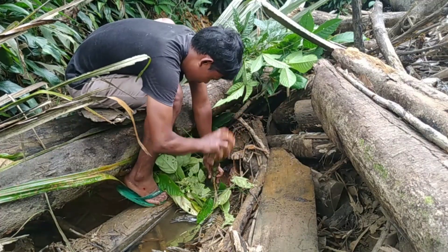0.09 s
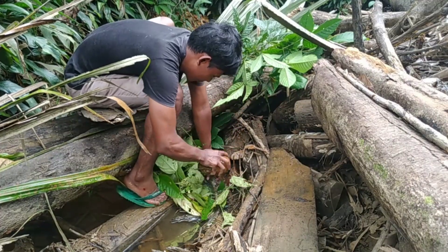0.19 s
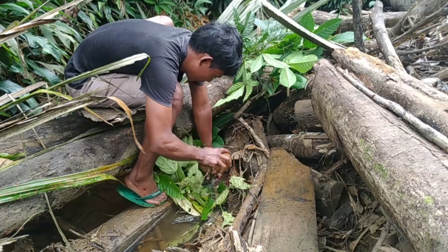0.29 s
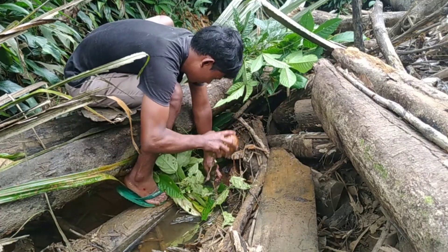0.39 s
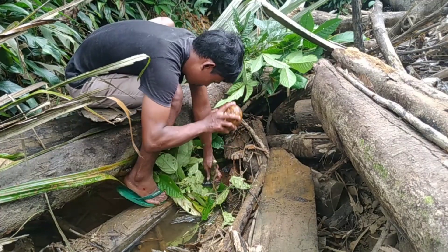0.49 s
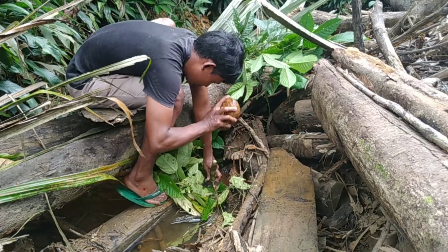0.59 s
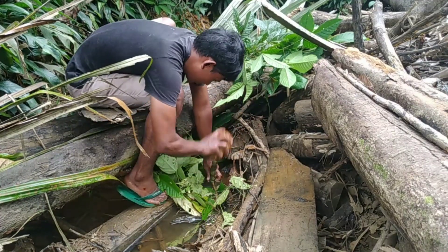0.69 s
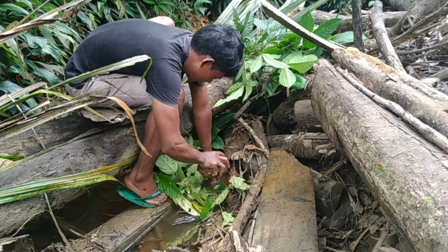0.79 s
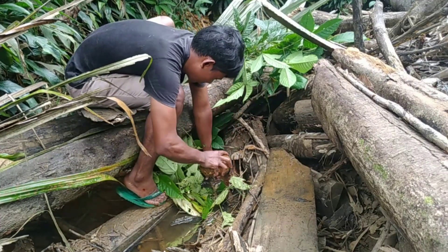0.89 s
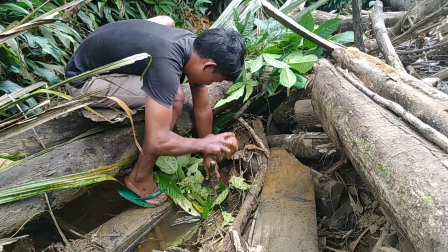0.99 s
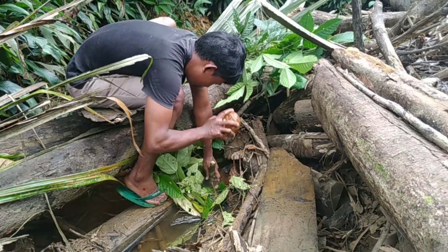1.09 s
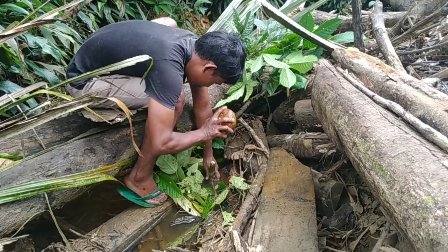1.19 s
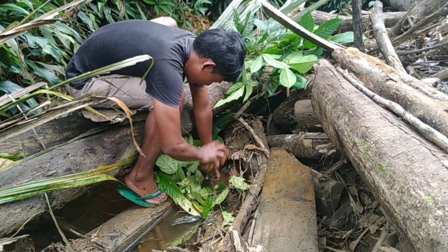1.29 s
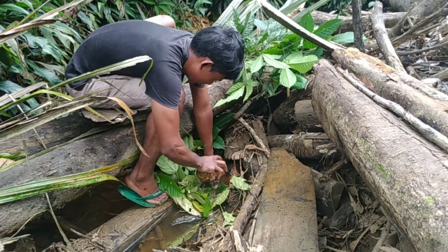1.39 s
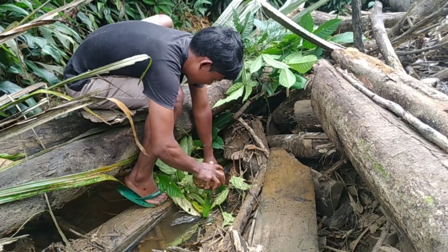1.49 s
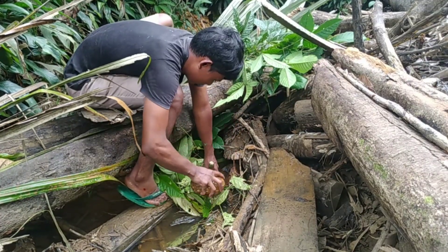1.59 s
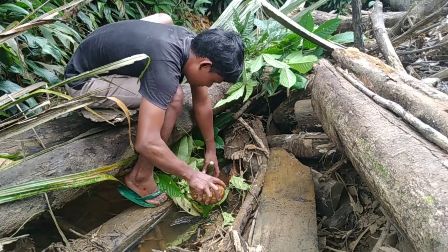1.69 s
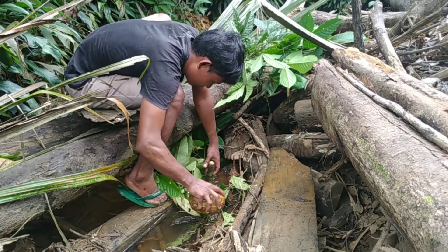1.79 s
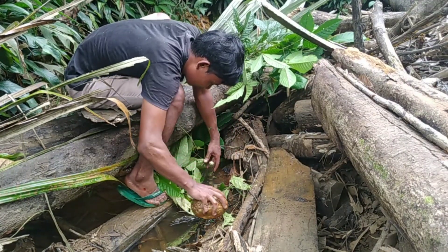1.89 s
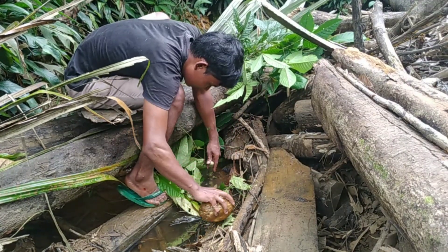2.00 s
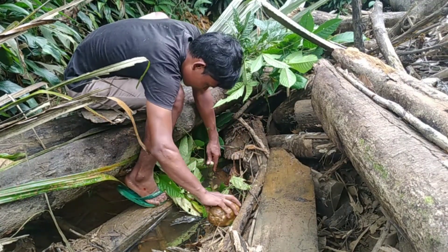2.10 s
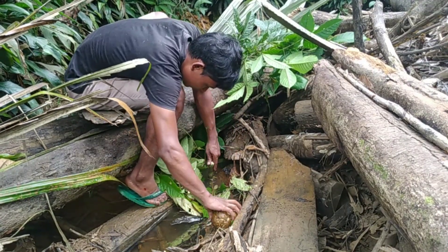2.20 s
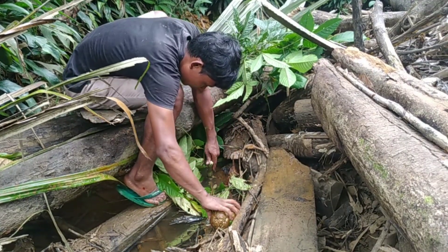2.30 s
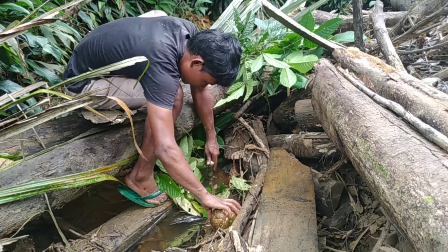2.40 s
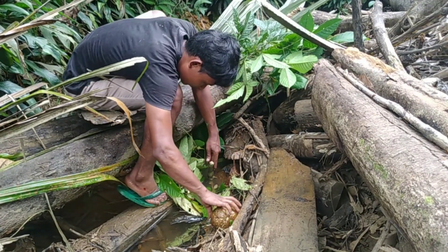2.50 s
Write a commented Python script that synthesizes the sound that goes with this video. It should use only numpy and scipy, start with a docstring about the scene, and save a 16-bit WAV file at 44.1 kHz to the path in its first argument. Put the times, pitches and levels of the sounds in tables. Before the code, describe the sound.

Fist-sized lump thuds three times on a leafy log with wet crunches, over steady cicada hiss

```python
"""Dull wooden knocks: a hard, fist-sized lump pounds wet leaves on a log three times, then is set down.
The knocks sum damped modes of the log; cracks, crunch, snaps and scatter are noise under decaying envelopes.
A hand shifts the leaves in between, heard as enveloped grainy noise; insects whistle near 12 kHz as gliding sines.
Cicadas hiss on the right in shaped noise with narrow trills, crickets trill in narrow bands of noise,
and air and stream water murmur faintly as low and broad shaped noise."""
import sys
import numpy as np
from scipy import signal
from scipy.fft import rfft, irfft
from scipy.io import wavfile

SR = 44100
rng = np.random.default_rng(int(sys.argv[2]) if len(sys.argv) > 2 else 0)


def wav_record(signal):
    """Record a signal, one row per channel, as 16-bit PCM in the file named by sys.argv[1]."""
    frames = np.transpose(np.atleast_2d(signal))
    bounded = np.clip(frames, -1, 1)
    # unit amplitude maps onto the largest positive 16-bit level
    quanta = np.round(bounded * 32767).astype(np.int16)
    wavfile.write(sys.argv[1], SR, quanta)


N = 112455
TIME = np.arange(N) / SR
FREQS = np.maximum(np.fft.rfftfreq(N, 1 / SR), 1)   # Hz, kept above zero for the logarithm


def from_db(db):
    """Level: an amplitude gain is ten to the power dB / 20."""
    return 10 ** (np.asarray(db) / 20)


def rms_one(x):
    """Normalisation: scale to unit mean power."""
    return x / np.sqrt(np.mean(x ** 2) + 1e-20)


def over_hz(rows):
    """Spectral interpolation: each table column is joined by straight lines over log frequency."""
    hz, *columns = np.transpose(rows)
    return [np.interp(np.log(FREQS), np.log(hz), column) for column in columns]


def pan(left_minus_right_db):
    """Constant-power panning: the two gains differ in level while their summed power is fixed."""
    ratio = from_db(np.atleast_1d(left_minus_right_db))
    return np.array([ratio, np.ones_like(ratio)]) * np.sqrt(2 / (1 + ratio * ratio))


def drift(rate_hz):
    """Low-pass random process: white noise weakened above a given rate, with rms 1."""
    white = rfft(rng.standard_normal(N))
    return rms_one(irfft(white / (1 + (FREQS / rate_hz) ** 2), N))


def noise(spectrum, place):
    """Interaural coherence: mid and side noises mix to a set likeness and balance at each frequency."""
    (level_db,) = over_hz(spectrum)
    likeness, lean_db = over_hz(place)
    likeness = np.clip(likeness, -1, 1)
    mid, side = rfft(rng.standard_normal((2, N)))
    pair = np.sqrt(1 + likeness) * mid + np.sqrt(1 - likeness) * side * [[1], [-1]]
    return rms_one(irfft(pair * from_db(level_db) * pan(lean_db), N))


def decay(age, t60):
    """Exponential damping: the level falls 60 dB in every t60."""
    return np.exp(-np.log(1000) * age / t60)


def burst(start, rise, hold, t60):
    """Transient envelope: linear attack, hold and exponential release, all in s."""
    age = TIME - start
    return np.clip(age / rise, 0, 1) * decay(np.maximum(age - rise - hold, 0), t60)


# Stereo image of the near sounds: f/Hz, likeness of left and right, left minus right/dB
NEAR_PLACE = [(100, 0.98, 0.5), (590, 0.73, -4), (1400, 0.36, 1), (2400, 0.18, -1), (4400, 0, -3.5),
              (8400, 0.13, -4), (11100, 0, -27), (15000, 0.3, -9)]
GRAINS_PER_S, GRAIN_DB = 1200, 3   # upper rate of the clumping; its level spread before limiting


def grainy(spectrum):
    """Amplitude modulation: fast random level swings clump noise like many tiny fibres snapping."""
    swing = np.clip(drift(GRAINS_PER_S), -2, 2)
    return rms_one(noise(spectrum, NEAR_PLACE) * from_db(GRAIN_DB * swing))


# Blows on the log, levels relative to each layer: t/s, knock level/dB, pitch factor, crack level/dB,
# crack centre f/Hz, crunch level/dB, scatter level/dB, second contact delay t/s, its relative level/dB
BLOWS = [(0.2206, 2, 1.01, 2.5, 2500, 0, -1, .0095, -29), (0.834, 3, 1, -3.5, 1170, -1, -2, 0.0045, -30),
         (1.4222, 0, 1.0, -1.5, 3100, -0.5, -0.5, .0088, -7),
         (2.262, -23.5, 1.0, -23, 1090, -18.5, -16, .012, -6.5)]
# Modes of the log before pitch, blow and filter act: f/Hz, level/dB, t60/s
LOG_MODES = [(109.9, -23, 0.13), (143, -24, 0.024), (198, -22, 0.05), (378, -11, 0.026), (453, -10, 0.027),
             (580, -24.5, 0.067), (740, -21.5, 0.031), (1025, -18, 0.027), (1160, -21, .035),
             (1393, -19.5, 0.021), (2340, -37.5, 0.13)]
KNOCK_LOW_CUT_HZ, CONTACT_HZ = 82, 3000   # the knocks are cut below this; the leaf cushion softens above
CONTACT_S = 0.00078   # time for the force to build


def knocks():
    """Modal superposition: two contacts per blow excite damped sinusoidal modes of the log."""
    out = np.zeros(N)
    for blow_s, blow_db, pitch, *_, delay_s, second_db in BLOWS:
        contacts = ((blow_s, blow_db), (blow_s + delay_s, blow_db + second_db))
        for start, contact_db in contacts:
            first = int(start * SR)
            age = TIME[:min(SR // 4, N - first)]
            force = np.minimum(age / CONTACT_S, 1)
            for hz, mode_db, t60 in LOG_MODES:
                chance_db = rng.standard_normal()   # no two contacts drive a mode alike
                gain = from_db(contact_db + mode_db + chance_db)
                mode = np.sin(2 * np.pi * hz * pitch * age) * decay(age, t60)
                out[first:first + len(age)] -= gain * force * mode
    band = signal.butter(1, [KNOCK_LOW_CUT_HZ, CONTACT_HZ], "band", fs=SR, output="sos")
    return signal.sosfilt(band, out + 1e-18)


# Spectrum of the crack before its peak is added: f/Hz, level per Hz/dB
CRACK_SPECTRUM = [(200, -27), (600, 0), (1300, 0), (1800, -2.5), (2500, -4.5), (3400, -5), (4300, -16),
                  (8000, -15), (10800, -12), (15000, -12)]
CRACK_DB, CRACK_RISE_S, CRACK_T60_S = -12, 0.00072, 0.019   # level before each blow's own
CRACK_PEAK_DB, CRACK_WIDTH_OCT = 10, 0.16   # Gaussian peak over log frequency


def cracks():
    """Spectral emphasis: a peak at its own frequency colours the brief noise of each first contact."""
    out = 0
    for start, _, _, blow_db, centre_hz, *_ in BLOWS:
        octaves = np.log2(FREQS / centre_hz)
        peak = from_db(CRACK_PEAK_DB * np.exp(-(octaves / CRACK_WIDTH_OCT) ** 2))
        crack = rms_one(irfft(rfft(noise(CRACK_SPECTRUM, NEAR_PLACE)) * peak, N))
        out = out + crack * from_db(CRACK_DB + blow_db) * burst(start, CRACK_RISE_S, 0, CRACK_T60_S)
    return out


# Spectrum of the squeezed wet leaves: f/Hz, level per Hz/dB
CRUNCH_SPECTRUM = [(200, 9.5), (500, 4), (800, 8), (1200, -4), (2000, -5.5), (3000, -1.5), (4000, -5.5),
                   (5200, -8), (8300, -9.5), (9600, 3.5), (10800, 10), (12000, 0.5), (13300, -12),
                   (15500, -12)]
CRUNCH_DB = -18.5   # before each blow's own level
CRUNCH_RISE_S, CRUNCH_HOLD_S, CRUNCH_T60_S = 0.00034, 0.012, 0.058


def crunch():
    """Granular friction: squeezed leaves give clumped noise that holds briefly, then decays."""
    envelope = 0
    for start, *_, blow_db, _, _, _ in BLOWS:
        squeeze = burst(start, CRUNCH_RISE_S, CRUNCH_HOLD_S, CRUNCH_T60_S)
        envelope += from_db(CRUNCH_DB + blow_db) * squeeze
    return envelope * grainy(CRUNCH_SPECTRUM)


# Stems snapping as they are squashed: t/s, level/dB
SNAPS = [(0.233, -26), (0.8442, -21), (0.8534, -22.5), (1.4305, -39), (1.443, -22)]
# Spectrum of the snaps: f/Hz, level per Hz/dB
SNAP_SPECTRUM = [(1000, -26), (3000, 12), (6000, 6), (8500, -29), (10800, 18), (13000, 6), (15500, -14)]
SNAP_RISE_S, SNAP_T60_S = 0.00013, 0.018


def snaps():
    """Impulsive fracture: each breaking stem releases a sharp burst of coloured noise."""
    envelope = sum(from_db(db) * burst(start, SNAP_RISE_S, 0, SNAP_T60_S) for start, db in SNAPS)
    return envelope * noise(SNAP_SPECTRUM, NEAR_PLACE)


# Spectrum scattered by the logs and trees around: f/Hz, level per Hz/dB
SCATTER_SPECTRUM = [(40, -44), (90, 13.5), (200, -0.5), (500, -7), (1200, -11), (2600, -5.5), (4200, -8.5),
                    (8000, -11), (11000, -1.5), (15000, -15.5)]
SCATTER_DB, SCATTER_RISE_S, SCATTER_T60_S = -23, 0.0055, 0.23   # level before each blow's own


def scatter():
    """Diffuse reflection: sound returned from the surroundings builds more slowly and lingers."""
    envelope = 0
    for start, *_, blow_db, _, _ in BLOWS:
        returned = burst(start, SCATTER_RISE_S, 0, SCATTER_T60_S)
        envelope += from_db(SCATTER_DB + blow_db) * returned
    return envelope * grainy(SCATTER_SPECTRUM)


# Leaves and sticks shifting: t/s, scuff level/dB, leaf hiss level/dB, rise t/s, t60/s
RUSTLES = [(0.2703, -44.5, -52, .002, 0.13), (0.3271, -28.5, -50, 0.0016, 0.054),
           (0.895, -69, -36, 0.016, .12), (0.929, -50, -53, 0.0033, 0.039), (1.490, -45, -45, 0.0033, .1),
           (1.60, -62, -57, 0.067, 0.87), (1.715, -52, -60, 0.02, 0.18), (2.236, -49.5, -53, 0.018, 0.13),
           (2.272, -51, -35, 0.0036, 0.16)]
# Spectrum of the woody scuff: f/Hz, level per Hz/dB
SCUFF_SPECTRUM = [(150, -30), (450, -4), (1000, 0.5), (1400, -2), (1650, 4), (1900, -5.5), (2200, 0),
                  (2550, -3), (2850, -1), (4000, -13), (6000, -23), (11000, -18), (15000, -28)]
# Spectrum of the leafy hiss: f/Hz, level per Hz/dB
LEAF_HISS_SPECTRUM = [(1000, -8), (3000, -10), (6000, -8), (9000, -13), (11500, 3), (13500, -4),
                      (15500, -24)]


def rustles():
    """Frictional noise: woody scuffs and leafy hisses share one envelope for each movement."""
    scuff, hiss = grainy(SCUFF_SPECTRUM), grainy(LEAF_HISS_SPECTRUM)
    out = 0
    for start, scuff_db, hiss_db, rise, t60 in RUSTLES:
        blend = from_db(scuff_db) * scuff + from_db(hiss_db) * hiss
        out = out + blend * burst(start, rise, 0, t60)
    return out


# Shrill insect notes, each a slow glide:
# start t/s, end t/s, start f/Hz, end f/Hz, level before trim and flutter/dB
WHISTLES = [(-.1, .2, 12250, 12265, -39), (.15, 1.45, 12230, 12670, -48), (.66, 1.38, 12125, 12310, -39.5),
            (1.07, 1.25, 12240, 12295, -31), (.92, 1.16, 12140, 12170, -41),
            (1.48, 2.16, 12345, 12500, -36.5), (1.49, 1.76, 12205, 12245, -37),
            (1.68, 2.24, 12240, 12320, -44), (.68, 1.47, 11700, 11800, -44), (1.4, 2.3, 11790, 11870, -53),
            (1.06, 2.35, 12880, 12690, -47), (2.1, 2.42, 12490, 12560, -41),
            (2.24, 2.65, 12075, 12130, -41)]
WHISTLE_TRIM_DB, WHISTLE_PAN_DB = -2, -16   # all whistlers together; left minus right
WHISTLE_FADE_S, WHISTLE_WAVER_HZ = 0.056, 15   # fade at both ends; rms pitch waver
FLUTTER_DB, FLUTTER_HZ = 2.3, 14   # rms level wander and its upper rate
RASP = 0.35   # rms depth of the faster amplitude modulation


def whistlers():
    """Frequency and amplitude modulation: nearly pure notes glide and flutter, with wandering left phase."""
    out = 0
    for start, end, from_hz, to_hz, db in WHISTLES:
        glide = np.interp(TIME, [start, end], [from_hz, to_hz])
        hz = glide + WHISTLE_WAVER_HZ * drift(27.3)
        gate = np.clip(np.minimum(TIME - start, end - TIME) / WHISTLE_FADE_S, 0, 1)
        flutter = from_db(db + WHISTLE_TRIM_DB + FLUTTER_DB * drift(FLUTTER_HZ))
        rasp = 1 + RASP * drift(260)
        phase = 2 * np.pi * np.cumsum(hz) / SR
        out = out + gate * flutter * rasp * np.sin([phase + 2 * drift(1.7), phase])
    return out * pan(WHISTLE_PAN_DB)


def trills(rows):
    """Narrow-band beating: many distant insects on nearly one pitch blur into fluctuating bands."""
    out = 0
    for hz, width, db, lean_db in rows:
        band = 1 / (1 + ((FREQS - hz) / (2 * width)) ** 2) ** 2
        trill = irfft(rfft(rng.standard_normal((2, N))) * band, N)
        out = out + from_db(db) * rms_one(trill) * pan(lean_db)
    return out


# Spectrum of the cicada chorus: f/Hz, level per Hz/dB
CICADA_SPECTRUM = [(5000, -55), (5450, -24), (5900, -16.5), (6400, -9.5), (7250, -7), (8000, -11.5),
                   (8500, -12.5), (8900, -4.5), (9500, -3), (10150, -2.5), (10800, -9.5), (11500, -17.5),
                   (12400, -13.5), (13200, -19), (15000, -22), (16000, -34)]
# Its stereo image: f/Hz, likeness of left and right, left minus right/dB
CICADA_PLACE = [(5000, 0, -9), (6300, 0.004, -6.5), (8400, 0.0038, -9), (9650, 0, -16), (11300, 0, -23),
                (12300, 0, -10), (13400, 0.033, -19), (14900, 0, -1)]
# Trills standing out of the chorus: f/Hz, nominal half width f/Hz, level/dB, left minus right/dB
CICADA_TRILLS = [(7203, 14, -57, -8), (8033, 8, -62, -8), (9360, 13, -52, -17), (9584, 14, -55, -17),
                 (9737, 16, -52, -17), (9897, 9, -54, -17), (10134, 13, -53, -17), (10886, 14, -56, -18)]
CICADA_DB, CICADA_FLICKER_DB = -37, 0.5   # mean level; rms flicker


def cicadas():
    """Incoherent summation: a chorus merges into broad flickering hiss with a few trills standing out."""
    level = from_db(CICADA_DB + CICADA_FLICKER_DB * drift(40))
    return level * noise(CICADA_SPECTRUM, CICADA_PLACE) + trills(CICADA_TRILLS)


# Cricket bands: f/Hz, nominal half width f/Hz, level relative to the swell/dB, left minus right/dB
CRICKETS = [(3093, 30.5, -1, 1.5), (3203, 38, -6, 2)]
# Swell of the crickets: t/s, level/dB
CRICKET_LEVEL = [(0, -58), (.35, -51.5), (.48, -60), (.75, -52.5), (1.1, -56), (1.3, -53.5), (1.58, -56),
                 (1.72, -50.5), (1.95, -54), (2.15, -55), (2.4, -52.5), (2.55, -54)]


def crickets():
    """Envelope modulation: lower narrow-band trills swell and fade together."""
    swell_db = np.interp(TIME, *np.transpose(CRICKET_LEVEL))
    return from_db(swell_db) * trills(CRICKETS)


# Spectrum of the moving air: f/Hz, level per Hz/dB
AIR_SPECTRUM = [(15, 2.5), (45, 0), (85, -8.5), (140, -16), (250, -32), (600, -26), (2000, -96)]
# Its stereo image: f/Hz, likeness of left and right, left minus right/dB
AIR_PLACE = [(30, 0.53, 0), (70, 0.9, 0), (120, 0.95, 0), (220, 0.26, 0)]
# Course of the gusts before random swell: t/s, level/dB
AIR_LEVEL = [(0, -50), (.55, -47.5), (.75, -43), (1.0, -42.5), (1.3, -49.5), (1.52, -41), (1.8, -46.5),
             (2.1, -44.5), (2.3, -43.5), (2.55, -46)]
AIR_SWELL_DB = 1   # rms


def air():
    """Low-frequency turbulence: moving air is a rumble whose level follows slow gusts."""
    gusts_db = np.interp(TIME, *np.transpose(AIR_LEVEL)) + AIR_SWELL_DB * drift(1)
    return from_db(gusts_db) * noise(AIR_SPECTRUM, AIR_PLACE)


# Spectrum of the faint stream: f/Hz, level per Hz/dB
STREAM_SPECTRUM = [(100, -2), (250, 3), (350, 1), (480, 0.5), (650, -4), (1500, -5.5), (2500, -4.5),
                   (3000, -5), (3600, -9), (4400, -8), (5500, -2), (15000, -25.5)]
# Its stereo image: f/Hz, likeness of left and right, left minus right/dB
STREAM_PLACE = [(200, 0.49, 0), (447, 0.41, 0), (1220, 0, 0)]
STREAM_DB = -52.5


def stream():
    """Stationary random noise: the stream is a steady broadband wash."""
    return from_db(STREAM_DB) * noise(STREAM_SPECTRUM, STREAM_PLACE)


def scene():
    """Linear superposition: the pounding close by adds to the forest all around."""
    pounding = knocks() + cracks() + crunch() + snaps() + scatter()
    forest = whistlers() + cicadas() + crickets() + air() + stream()
    return pounding + rustles() + forest


CUTOFF_HZ = 15250   # 3 dB down


def record(dry):
    """Clipping and band limiting: peaks stop at full scale, then a steep low-pass cuts the top."""
    low_pass = 1 / np.sqrt(1 + (FREQS / CUTOFF_HZ) ** 120)
    return irfft(rfft(np.clip(dry, -1, 1)) * low_pass, N)


dry = scene()
out = record(dry)
wav_record(out)
```